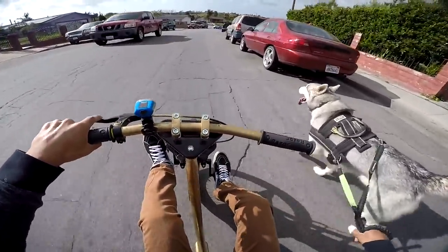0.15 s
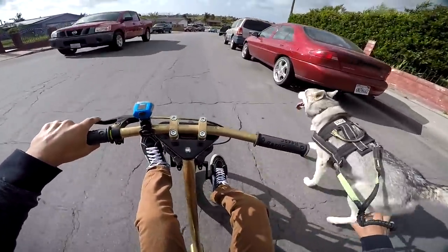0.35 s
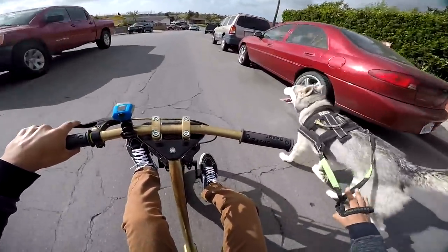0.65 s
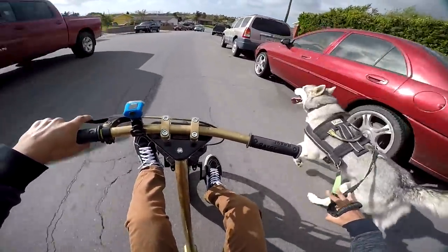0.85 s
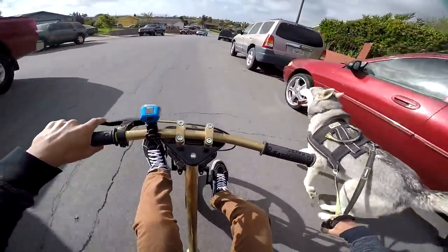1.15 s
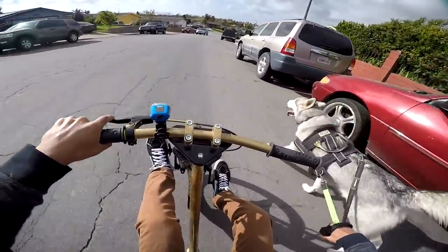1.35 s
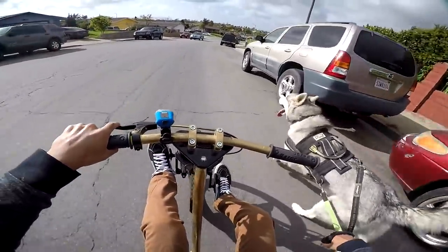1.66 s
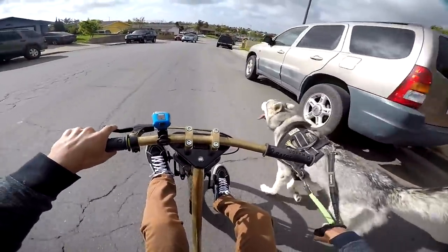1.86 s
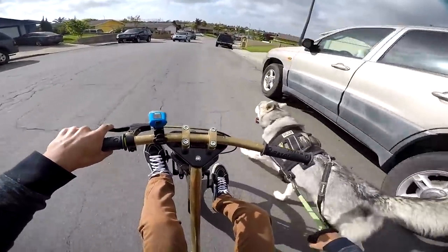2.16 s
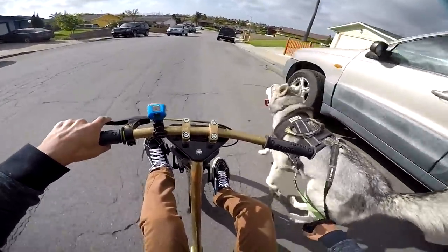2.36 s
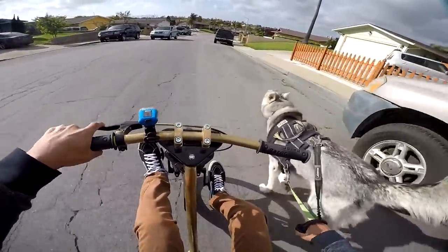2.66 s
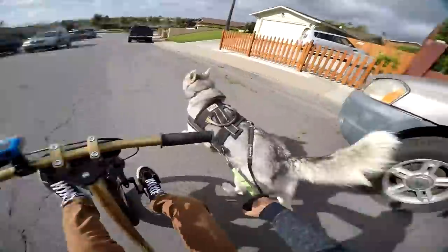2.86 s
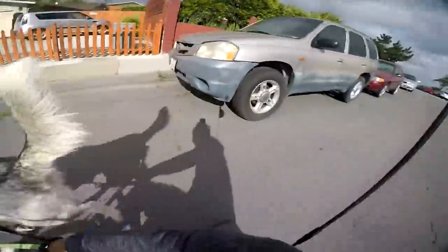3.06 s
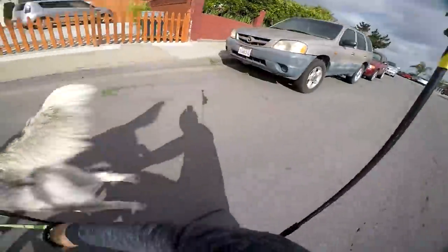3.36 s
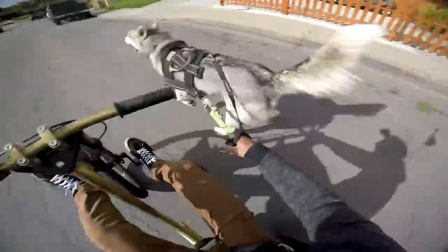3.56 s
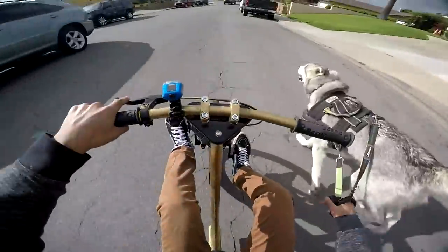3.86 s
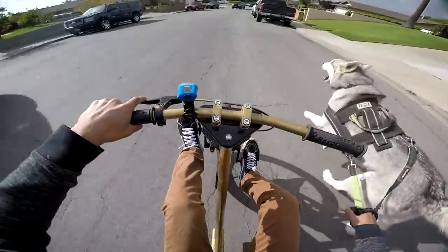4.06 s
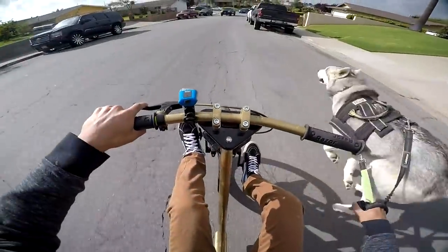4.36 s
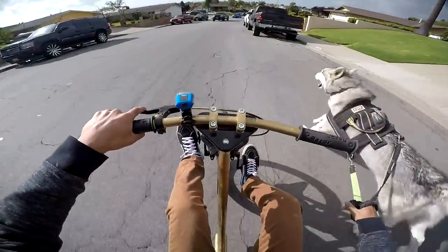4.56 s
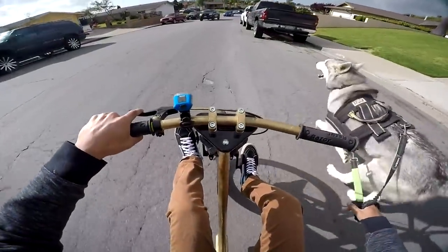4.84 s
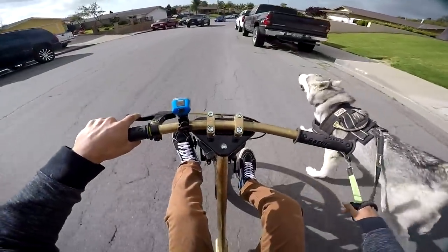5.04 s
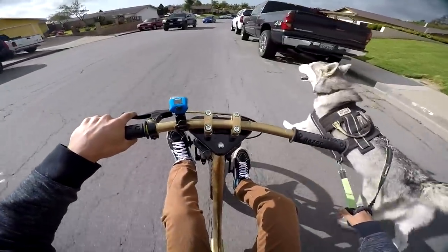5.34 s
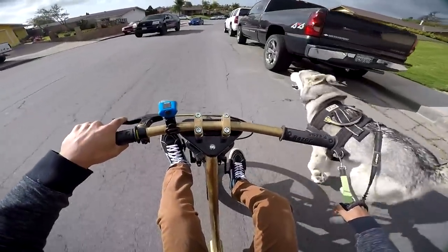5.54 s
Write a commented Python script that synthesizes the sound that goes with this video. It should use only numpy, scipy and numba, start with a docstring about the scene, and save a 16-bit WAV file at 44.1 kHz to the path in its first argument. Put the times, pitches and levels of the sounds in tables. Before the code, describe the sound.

Strong wind thumps and flutters on a rider's camera microphone while tyres rush over rough asphalt, with occasional faint tag jingles and grit crunches.

```python
"""Wind heaves, thumps and flutters on a camera's microphone, on the rider of a scooter pulled fast by a dog.
Wind: noise in four size ranges, plus swinging puffs; it drops briefly after the rider looks aside.
Tyres: dense random clicks rush over rough asphalt; ringing snaps and sprays crunch on grit.
Freewheel: faint resonant clicks, slowly speeding up. Harness tags: decaying modes jingle now and then."""
import sys
import numpy as np
from scipy import signal
from scipy.fft import rfft, irfft
from scipy.io import wavfile
from scipy.ndimage import uniform_filter1d, minimum_filter1d
from numba import njit

SR = 44100
rng = np.random.default_rng(int(sys.argv[2]) if len(sys.argv) > 2 else 0)


def int16_out(signal):
    """Quantize to a 16-bit WAV file."""
    q = np.round(np.clip(np.atleast_2d(signal).T, -1, 1) * 32767)
    wavfile.write(sys.argv[1], SR, q.astype(np.int16))


N = 251370

# ratchet clicks of the coasting freewheel
PAWL_PER_S, PAWL_GAIN_PER_S2 = 43, 4.6
# faint pawl clicks over road control: [usual level/dB, slope/(dB per dB)]
PAWL_LAW = (-74.5, 1.3)
# tag swings against the buckle and rattles:
# [t/s, relative level/dB, ring time to -60 dB/s, tilt above strongest mode/(dB per octave),
#  rattle decay/s, rattle level/dB]
TAG_STRIKES = [(0.2453, -51, .07, -11.5, .025, -10), (0.4993, -37.5, 0.23, -10, .012, -16),
               (0.668, -50, 0.09, -6, .045, -7), (0.8769, -55, .08, 6, .03, -9),
               (1.088, -53.5, .09, 2, .035, -9), (1.245, -56, 0.1, 18, .02, -7),
               (1.462, -55, .06, 3, .015, -9), (1.5214, -42, 0.12, 2, .02, -14),
               (1.555, -45.5, 0.29, -20, .03, -14), (2.0158, -57.5, 0.07, 16, .02, -8),
               (2.2872, -47, 0.05, -2, 0.04, -11.5), (2.49, -64, 0.08, 6, .04, -8),
               (3.1038, -49, 0.06, -27, .025, -8), (3.53, -52, 0.05, -11, .012, -3),
               (3.9714, -53.5, .04, -16, .02, -7)]
# modes of the tag: [f/Hz, relative level/dB, share of ring time]
TAG_MODES = [(4240, -12, .6), (5330, 0, 0.93), (6690, -17, .6), (9530, -6, 0.2), (10070, 0.5, 0.69),
             (12885, -8, .4), (13452, -5, .45), (13955, -14, .7), (15220, -9, .6)]
# loose grit crackling under the tyres: [t/s, level/dB]
LOOSE_GRIT_LEVEL = [(0, -52.5), (1.6, -52), (3.1, -52.5), (3.35, -60), (3.8, -59.5), (4.08, -51),
                    (4.9, -49), (5.2, -56.5), (5.36, -50.5), (5.7, -53)]
# resonances of cracking grit: [f/Hz, width/Hz, relative level/dB]
GRIT_MODES = [(1750, 430, -13.5), (3320, 340, -0.5), (4030, 400, 1.5), (5170, 1200, -2.5),
              (5690, 440, -0.5)]
# tyre crunches over a stone or a crack: [t/s, relative level/dB, centre f/Hz, decay/s]
CRUNCHES = [(0.0256, -31, 3500, 0.0066), (0.791, -30, 2200, .012), (0.834, -34, 3500, 0.011),
            (0.9247, -31, 3000, 0.023), (1.929, -34, 5770, .003), (2.408, -32.5, 5770, 0.009),
            (3.003, -33, 5650, 0.009), (4.502, -31, 4540, 0.007), (4.637, -33, 4160, 0.0072),
            (4.733, -28.5, 3800, 0.005), (4.749, -31, 1600, .007), (4.766, -28.5, 1500, 0.0061)]
CRACK_WIDTH_HZ = 1500
# road control, driving hiss and freewheel: [t/s, level/dB]
ROAD_CONTROL = [(0, -41), (0.2, -44), (0.36, -41.5), (0.55, -42), (0.85, -42), (1.15, -43), (1.62, -41),
                (2.42, -44), (2.7, -43), (3.12, -42.2), (3.35, -48), (3.75, -51.5), (4.06, -46.5),
                (4.85, -48), (5.2, -51.5), (5.7, -47)]
# low roar of the tyres, before patches and gusts: [t/s, level/dB]
ROAR_LEVEL = [(0, -38.5), (0.25, -47), (0.45, -38.5), (0.6, -40.5), (1.0, -41), (1.15, -43), (1.5, -36),
              (1.8, -34), (2.3, -36), (2.6, -36), (3.3, -39), (3.65, -43), (4.2, -42), (4.6, -38),
              (5.2, -39.5), (5.7, -40.5)]
# tyre hiss over road control: [usual level/dB, slope/(dB per dB)]
HISS_LAW = (-46.5, 1.25)
# tyre rasps over coarse asphalt: [middle t/s, length/s, roar change/dB, hiss change/dB]
COARSE_PATCHES = [(0.36, 0.25, 8, 1), (0.78, 0.5, 6.5, 2.5), (0.96, 0.19, 5.5, 0.5), (1.296, 0.13, 6.5, 6),
                  (1.46, .12, 1, 3), (1.628, 0.13, 1, 3), (2.028, 0.1, -1.5, 0), (2.162, 0.056, 7.5, 4),
                  (2.683, 0.22, 2, 1.5), (3.02, 0.067, 8, 1.5), (3.165, 0.11, 4, 0.5), (3.533, 0.17, 6, 4),
                  (4.758, 0.06, 6, 1), (4.91, 0.16, 4.5, 3.5)]
# tyre roar spectrum: [f/Hz, relative level/(dB per Hz)]
ROAR_SPECTRUM = [(300, -7.5), (700, 7), (1100, 3.5), (1500, -2), (1800, -2), (2100, -13), (2700, -26),
                 (5000, -37.5), (8000, -48.5)]
# tyre hiss spectrum: [f/Hz, relative level/(dB per Hz)]
HISS_SPECTRUM = [(1400, -2), (2300, 5), (3300, 1.5), (4100, -1.5), (4900, -6), (5900, -2.5), (7200, -16.5),
                 (9500, -20), (11000, -31), (12000, -38), (15000, -54)]
# wind strength on the microphone, before lulls: [t/s, control/dB]
WIND_CONTROL = [(0, -18.5), (0.31, -15), (0.57, -17), (0.75, -14.5), (1.0, -13.5), (1.12, -14.5),
                (1.4, -14.5), (1.58, -17.5), (1.7, -11.5), (2.3, -13), (2.45, -14), (2.65, -14.5),
                (2.95, -16), (3.0, -20.5), (3.15, -22), (3.19, -16), (3.42, -14.5), (3.5, -21.5),
                (3.6, -28.5), (3.76, -25), (4.08, -20.5), (4.25, -22), (4.33, -17.5), (4.76, -15.5),
                (4.84, -22), (4.9, -13.5), (5.13, -19), (5.33, -15), (5.55, -15.5), (5.7, -12.5)]
# deep heave of the wind, before lulls: [t/s, level/dB]
HEAVE_LEVEL = [(0, -12.5), (0.5, -14.5), (1.55, -17.5), (1.8, -12.5), (2.5, -12.5), (3.1, -12.5),
               (3.68, -13.5), (3.77, -20.5), (3.95, -14), (4.2, -13.5), (4.4, -11), (4.92, -12),
               (5.08, -12.5), (5.7, -14.5)]
USUAL_WIND_DB, USUAL_ROAD_DB, USUAL_HEAVE_DB = -16, -45, -13
# air goes slack: [middle t/s, length/s, heave loss/dB, buffeting and flutter control loss/dB]
LULLS = [(0.56, 0.14, 1.5, 3), (0.94, 0.1, 6, 1), (1.398, 0.18, 0.5, 5.5), (1.978, .07, 9, 1.5),
         (2.805, 0.055, 2.5, 1), (3.305, .08, 3.5, -1.5), (5.09, 0.2, 6, 1)]
# buffeting over wind control: [usual level/dB, slope/(dB per dB)]
BUFFET_LAW = (-15, 0.94)
# flutter over wind control: [usual level/dB, slope/(dB per dB)]
FLUTTER_LAW = (-23.5, 0.98)
# single puffs thump the microphone:
# [middle t/s, length/s, swell level/dB, mean swell f/Hz, buffeting level/dB, flutter level/dB]
PUFFS = [(0.077, 0.11, -8.5, 68.2, -20, -30), (0.258, 0.13, -15, 80.5, -14, -24.5),
         (0.764, 0.15, -19, 100, -13, -23), (0.868, 0.061, -2.5, 47.8, -26, -18),
         (1.064, 0.2, -25, 98.7, -12, -27.5), (1.464, 0.14, -26, 90, -17, -33),
         (1.785, 0.12, -12, 44, -26, -21.5), (2.07, 0.17, -10, 69.8, -14.5, -24.5),
         (2.277, 0.094, -11.5, 90.3, -10, -32), (2.5, 0.071, -10.5, 89.8, -15, -29),
         (2.69, 0.083, -9.5, 85.05, -14, -33), (2.963, 0.066, -7, 35.9, -19, -23),
         (3.066, 0.059, -8, 55, -28, -32), (3.111, 0.039, -9, 129, -25, -36),
         (3.186, 0.049, -1.5, 68.04, -22, -27), (3.253, 0.065, -6, 85.4, -11, -23),
         (3.435, 0.089, -10, 75.2, -19.5, -26), (3.531, 0.062, -9, 40.2, -16, -28),
         (3.616, 0.045, -12.5, 110, -19, -30.5), (3.678, 0.075, -11, 55, -12, -26),
         (3.779, 0.033, -31, 90, -24, -25), (3.86, 0.12, -23, 89.5, -24, -25.5),
         (4.755, .07, -7.5, 34.1, -27, -31), (4.893, .1, -7.5, 40, -21, -27),
         (4.98, 0.066, -11.5, 62, -19, -26), (5.174, 0.063, -17, 89.3, -15.5, -19.5),
         (5.303, 0.07, -10, 49.7, -26, -29)]
# sharp eddies slap the microphone: [t/s, relative level/dB]
SLAPS = [(0.772, -16), (1.146, -16), (1.689, -15), (2.117, -15), (3.183, -19), (3.216, -14), (3.26, -21),
         (3.443, -18), (3.672, -19), (4.365, -21), (4.879, -18), (4.965, -19), (5.173, -16.5), (5.381, -18)]
# top edge of flutter in the usual wind, lower after the rider has turned back: [t/s, f/Hz]
FLUTTER_EDGE = [(0, 573), (2.2, 598), (2.7, 558), (3.3, 587), (3.7, 590), (4.0, 510), (4.75, 502),
                (4.9, 556), (5.7, 565)]
EDGE_OCTAVES_PER_DB, EDGE_LOWEST_HZ, EDGE_HIGHEST_HZ = 0.05, 465, 660
# large eddies: [f/Hz, relative level/(dB per Hz)]
HEAVE_SPECTRUM = [(14, -3.5), (26, -1), (45, -4.5), (80, -6), (115, -8.5), (180, -21)]
# smaller eddies: [f/Hz, relative level/(dB per Hz)]
BUFFET_SPECTRUM = [(70, -19), (120, -2.5), (180, 1), (260, -3.5), (350, -8.5), (480, -18), (800, -36)]
# small eddies, before the moving edge: [f/Hz, relative level/(dB per Hz)]
FLUTTER_SPECTRUM = [(250, -10), (400, 1.5), (520, -4), (700, -2.5), (1200, -17.5)]
# finest eddies, above the edge: [f/Hz, relative level/(dB per Hz)]
SPUTTER_SPECTRUM = [(750, 3.5), (1100, -1.5), (2000, -21), (4000, -39.5), (8000, -61.5)]
# dip of the microphone port: [f/Hz, width/Hz, gain/dB]
PORT_DIP = (7300, 2950, -10)
CUTOFF_HZ, FADE_S, PEAK_LIMIT = 15400, .004, .95


def from_db(db):
    """Decibels to gain."""
    return 10 ** (np.asarray(db) / 20)


def rms_one(x):
    """Scale to an rms of 1."""
    return x / np.sqrt(np.mean(x ** 2) + 1e-20)


def in_time(rows):
    """Interpolate each column sample by sample."""
    t_s, *columns = np.transpose(rows)
    return [np.interp(np.arange(N) / SR, t_s, column) for column in columns]


def follow(law, control_db):
    """Layer level in dB, linear in its control."""
    usual_db, slope = law
    return usual_db + slope * control_db


def hump(middle_s, length_s):
    """Smooth rise to 1 and back."""
    return np.cos(np.pi * np.clip((np.arange(N) / SR - middle_s) / length_s, -.5, .5)) ** 2


def drift(corner_hz):
    """Slow random motion of rms 1; its spectrum falls away above the corner."""
    hz = np.arange(N // 2 + 1) / N * SR
    return rms_one(irfft(rfft(rng.standard_normal(N)) / (1 + (hz / corner_hz) ** 2), N))


def coloured(x, spectrum):
    """Shape x by a spectrum that falls away beyond its end points; rms 1."""
    hz = np.maximum(np.arange(N // 2 + 1) / N * SR, 1)
    points_hz, points_db = np.transpose(spectrum)
    gain = from_db(np.interp(np.log(hz), np.log(points_hz), points_db))
    skirts = np.minimum(1, np.minimum(hz / points_hz[0], points_hz[-1] / hz)) ** 2
    return rms_one(irfft(rfft(x) * gain * skirts, N))


def grains(per_s, spread_db):
    """Random clicks, many small and a few large; rms 1."""
    size_db = spread_db * np.minimum(rng.exponential(1, N), 5)
    sizes = from_db(size_db) * rng.choice([-1, 1], N)
    return rms_one(sizes * (rng.random(N) < per_s / SR))


def resonance(x, hz, width_hz):
    """Two-pole band-pass with a gain of 1 on top."""
    r = np.exp(-np.pi * width_hz / SR)
    zeros = np.array([1, 0, -1]) * (1 - r * r) / 2
    poles = [1, -2 * r * np.cos(2 * np.pi * hz / SR), r * r]
    return signal.lfilter(zeros, poles, x + 1e-18)


def bursts(rows, rise_s, decay_s):
    """Envelope that jumps at each event and dies away."""
    t = np.arange(N) / SR
    shape = np.minimum(t / rise_s, 1) * np.exp(-np.minimum(t / decay_s, 20))
    force = np.zeros(N)
    for t_s, level_db in rows:
        at = max(int(t_s * SR), 0)
        force[at:] += from_db(level_db) * shape[:N - at]
    return force


def freewheel(road_db, vary_db=3):
    """The pawl drops over each ratchet tooth and rings very briefly."""
    per_s = PAWL_PER_S + PAWL_GAIN_PER_S2 * np.arange(N) / SR
    teeth = np.diff(np.floor(np.cumsum(per_s) / SR), prepend=0)
    clicks = teeth * from_db(vary_db * rng.standard_normal(N))
    rings = resonance(clicks, 8900, 700) + from_db(-9) * resonance(clicks, 12100, 400)
    return from_db(follow(PAWL_LAW, road_db)) * rms_one(rings)


def tags(trim_db=-5.5, touches_per_s=350, scrape_db=-9, vary_db=3.5):
    """The tag rattles around each strike; every touch excites its modes anew, the strike's hardness tilts them."""
    out, t = np.zeros(N + SR), np.arange(SR // 2) / SR
    hz, mode_db, share = np.transpose(TAG_MODES)[:, :, None]
    octaves_up = np.log2(np.maximum(hz / hz[np.argmax(mode_db)], 1))   # above the strongest mode
    lead = SR // 10   # rattle starts ahead of the strike
    for t_s, level_db, t60_s, tilt_db, rattle_s, rattle_db in TAG_STRIKES:
        swing = from_db(rattle_db) * np.exp(-np.abs(t - t[lead]) / rattle_s)
        touched = rng.random(len(t)) < touches_per_s / SR
        touches = touched * rng.standard_normal((len(TAG_MODES), len(t))) * swing
        touches[:, lead] = 1   # the strike
        strength = from_db(mode_db + tilt_db * octaves_up + vary_db * rng.standard_normal(hz.shape))
        decay = np.exp(-np.log(1000) * t / (t60_s * share))
        modes = strength * decay * np.sin(2 * np.pi * hz * t)
        rub = rng.standard_normal(len(t)) * np.exp(-t / .006)
        scrape = from_db(scrape_db) * resonance(rub, 10000, 5000)
        clink = signal.fftconvolve(touches, modes, axes=1).sum(axis=0)
        clink = clink + signal.fftconvolve(touches[0], scrape)
        at = max(int(t_s * SR) - lead, 0)
        out[at:at + len(t)] += from_db(level_db + trim_db) * clink[:len(t)]
    return out[:N]


def grit(top_hz=7200, stones_db=-6.0):
    """Loose grains snap and ring; each stone or crack gives a short, dense spray of its own colour."""
    snaps = grains(per_s=2200, spread_db=4.5)
    rings = np.zeros(N)
    for k, (hz, width_hz, level_db) in enumerate(GRIT_MODES):
        rings = rings + (-1) ** k * from_db(level_db) * resonance(snaps, hz, width_hz)
    out = from_db(in_time(LOOSE_GRIT_LEVEL)[0]) * rms_one(rings)
    spray = grains(per_s=5400, spread_db=0.5)
    for t_s, level_db, hz, decay_s in CRUNCHES:
        envelope = bursts([(t_s, level_db + stones_db)], 0.00031, decay_s)
        out = out + envelope * rms_one(resonance(spray, hz, CRACK_WIDTH_HZ))
    return signal.sosfilt(signal.butter(6, top_hz, fs=SR, output="sos"), out)


def tyres(road_db, gusts):
    """The tread strikes countless asphalt grains; coarse patches and gusts make the rush uneven."""
    roar_db, hiss_db = in_time(ROAR_LEVEL)[0], follow(HISS_LAW, road_db)
    for middle_s, length_s, roar_change_db, hiss_change_db in COARSE_PATCHES:
        patch = hump(middle_s, length_s)
        roar_db = roar_db + roar_change_db * patch
        hiss_db = hiss_db + hiss_change_db * patch
    roar_db = roar_db + 2.2 * drift(45) + 1.5 * gusts
    hiss_db = hiss_db + 1.9 * drift(45)
    roar = coloured(grains(per_s=7000, spread_db=2.5), ROAR_SPECTRUM) * from_db(roar_db)
    hiss = coloured(grains(per_s=12000, spread_db=2.5), HISS_SPECTRUM) * from_db(hiss_db)
    return roar + hiss


def turbulence(spectrum, even_s):
    """Eddies of one size range, their strength evened out over spans longer than even_s."""
    x = coloured(rng.standard_normal(N), spectrum)
    width = max(int(even_s * SR), 2)
    power = uniform_filter1d(uniform_filter1d(x ** 2, width), width)
    return x / np.sqrt(power + 1e-9)


@njit
def sweep(x, slope, damping):
    """Two-pole low-pass with a moving corner; slope = tan(pi corner / sample rate)."""
    out = np.zeros(len(x))
    band_state, low_state = 0., 0.
    for i in range(len(x)):
        g = slope[i]
        band = (band_state + g * (x[i] - low_state)) / (1 + g * (g + damping))
        out[i] = low_state + g * band
        band_state, low_state = 2 * band - band_state, 2 * out[i] - low_state
    return out


def edged(x, hz):
    """Steep six-pole low-pass with a slight shoulder at the moving corner."""
    slope = np.tan(np.pi * hz / SR)
    for damping in (np.sqrt(3), np.sqrt(2), 0.5):
        x = sweep(x, slope, float(damping))
    return x


def slacken(heave_db, wind_db):
    """Slack air lets the heave and the wind control change for a moment."""
    for middle_s, length_s, heave_loss_db, wind_loss_db in LULLS:
        lull = hump(middle_s, length_s)
        heave_db = heave_db - heave_loss_db * lull
        wind_db = wind_db - wind_loss_db * lull
    return heave_db, wind_db


def puffs(heave, push, flutter, wander_octaves=.24):
    """Each puff rocks the air for a few uneven swings and stirs up buffeting and flutter."""
    uneven_s = np.cumsum(2 ** (wander_octaves * drift(60))) / SR
    for middle_s, length_s, swell_db, swell_hz, buffet_db, flutter_db in PUFFS:
        puff = hump(middle_s, length_s)
        swing = np.sin(2 * np.pi * (swell_hz * uneven_s + rng.random()))
        heave = heave + from_db(swell_db) * puff * swing
        push = np.hypot(push, from_db(buffet_db) * puff)
        flutter = np.hypot(flutter, from_db(flutter_db) * puff)
    return heave, push, flutter


def fine_eddies(flutter, sputter_db=-18.5, sputter_growth=0.53):
    """Small eddies flutter up to a sharp edge that rises with their force; finer ones sputter above."""
    force_db = 20 * np.log10(flutter) - FLUTTER_LAW[0]
    edge_hz = in_time(FLUTTER_EDGE)[0] * 2 ** (EDGE_OCTAVES_PER_DB * force_db)
    edge_hz = np.clip(edge_hz, EDGE_LOWEST_HZ, EDGE_HIGHEST_HZ)
    eddies = edged(turbulence(FLUTTER_SPECTRUM, even_s=0.023), edge_hz)
    sputter_gain = from_db(sputter_db + sputter_growth * force_db)   # relative to the flutter
    return flutter * (eddies + sputter_gain * turbulence(SPUTTER_SPECTRUM, even_s=0.018))


def wind(gusts, slap_db=-2.5, flutter_gust_db=1.0, buffet_gust_db=1.33, heave_share=.3):
    """Large eddies heave on the microphone, smaller ones buffet, the smallest flutter and sputter."""
    heave_db, wind_db = slacken(in_time(HEAVE_LEVEL)[0], in_time(WIND_CONTROL)[0] - USUAL_WIND_DB)
    heave = from_db(heave_db) * turbulence(HEAVE_SPECTRUM, even_s=0.028)
    push_db = follow(BUFFET_LAW, wind_db) + heave_share * (heave_db - USUAL_HEAVE_DB)
    push = from_db(push_db + buffet_gust_db * gusts)
    flutter = from_db(follow(FLUTTER_LAW, wind_db) + flutter_gust_db * gusts)
    heave, push, flutter = puffs(heave, push, flutter)
    flutter = flutter + from_db(slap_db) * bursts(SLAPS, rise_s=0.0019, decay_s=0.0048)
    return heave + push * turbulence(BUFFET_SPECTRUM, even_s=0.035) + fine_eddies(flutter)


def scene():
    """Harness, wheels and wind add up at one microphone; shared gusts move roar and wind together."""
    gusts = drift(25)
    road_db = in_time(ROAD_CONTROL)[0] - USUAL_ROAD_DB
    mix = freewheel(road_db) + tags() + grit() + tyres(road_db, gusts) + wind(gusts)
    return mix[None]


def limiter(x, top=PEAK_LIMIT, hold_s=0.0072):
    """The gain dips smoothly around peaks, the more the nearer they come to overload."""
    width = max(int(hold_s * SR), 4)
    needed = minimum_filter1d((1 + (x / top) ** 8) ** (-1 / 8), 2 * width)
    return x * uniform_filter1d(uniform_filter1d(needed, width), width)


def record(dry):
    """The port hollows out the treble, peaks are held down, the end fades, the top is cut."""
    hz, width_hz, dip_db = PORT_DIP
    ported = dry - (1 - from_db(dip_db)) * resonance(dry, hz, width_hz)
    fade = np.minimum(1, np.arange(N)[::-1] / (FADE_S * SR))
    top_cut = signal.ellip(10, .1, 80, CUTOFF_HZ, fs=SR, output="sos")
    return signal.sosfilt(top_cut, fade * limiter(ported))


dry = scene()
out = record(dry)
int16_out(out)
```